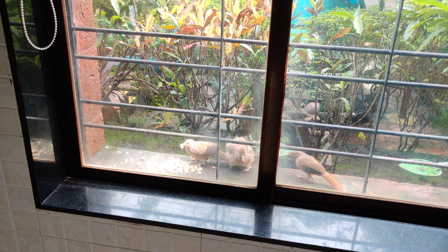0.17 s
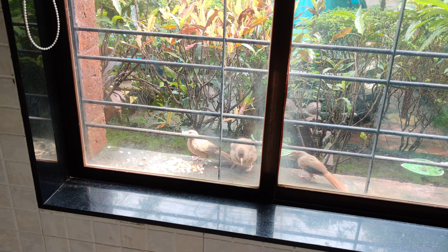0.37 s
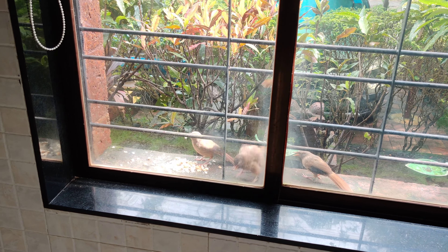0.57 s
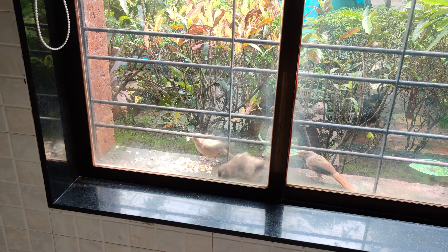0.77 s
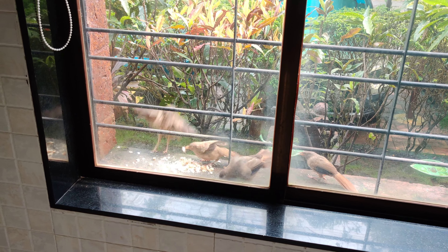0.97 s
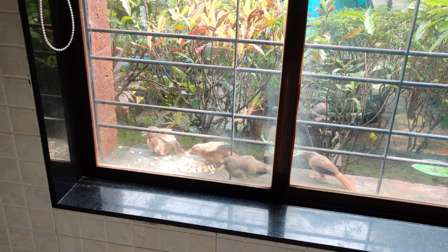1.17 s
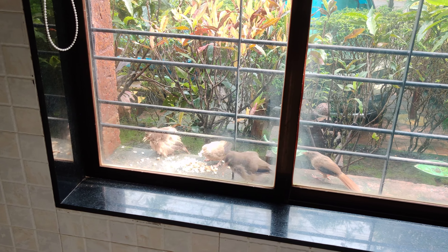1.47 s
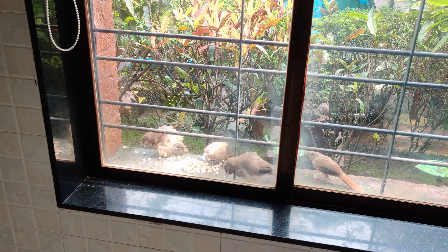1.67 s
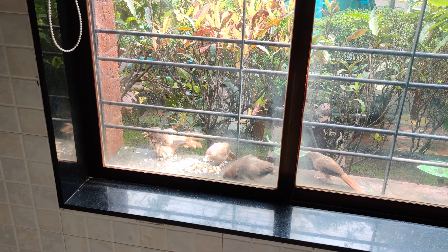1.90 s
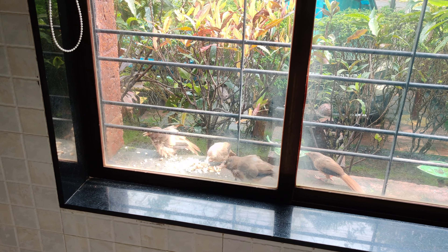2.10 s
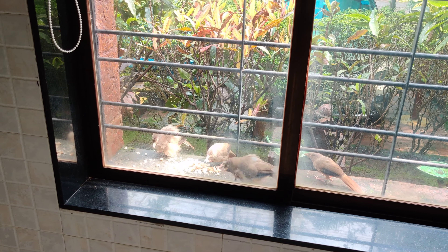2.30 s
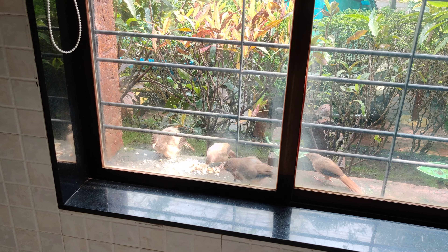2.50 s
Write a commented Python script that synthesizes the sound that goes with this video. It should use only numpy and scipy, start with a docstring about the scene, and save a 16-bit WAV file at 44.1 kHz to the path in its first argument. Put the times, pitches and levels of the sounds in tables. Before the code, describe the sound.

Harsh bird chatter begins with a few sharp dropping chirps, swells into rapid overlapping buzzy rasps, then fades to faint far peeps; picked up indoors with short hard reverberation, soft hum and low rumble.

```python
"""Babblers chatter on a ledge outside a window, heard from a hard tiled room.
From the start, a low hum, rumble and outdoor murmur lie beneath one bird's quick falling chirps, and a faint
low tone soon wavers up. Then the group rasps in overlapping harsh calls; soft peeps of a far bird come last.
Each call is made of uneven pulses and gated noise shaped by throat and beak; the room smears it with echoes
and fading noise tails. Hum, low tone and peeps are sines; murmur and rumble are shaped noise."""
import sys
import numpy as np
from scipy import signal
from scipy.fft import rfft, irfft
from scipy.io import wavfile
from scipy.ndimage import uniform_filter1d

SR = 44100
rng = np.random.default_rng(int(sys.argv[2]) if len(sys.argv) > 2 else 0)


def decibels_to_gain(level_db):
    """Convert a level in decibels to a linear amplitude gain (20 dB per decade)."""
    exponent = np.asarray(level_db, float) / 20
    return 10 ** exponent


def wav_out(sig):
    """Save sig, one row per channel (or a flat mono array), as 16-bit PCM at SR to the path in sys.argv[1]."""
    wavfile.write(sys.argv[1], SR, np.round(np.clip(np.atleast_2d(sig).T, -1, 1) * 32767).astype(np.int16))


N = 116865

# loss of the clear partials from start to end of a call: [chirp/dB, rasp/dB]
CLEAR_FADE_DB = [-26., -6.]


def evened(x):
    """Scales a sound to rms 1."""
    return x / np.sqrt(np.mean(x ** 2) + 1e-20)


def read(points, hz):
    """Reads a curve of (f/Hz, value) points along a logarithmic pitch axis."""
    f, value = np.transpose(points)
    return np.interp(np.log(hz + 1), np.log(f + 1), value)


def add(mix, s, sound):
    """Adds a sound to the mix, starting at s seconds."""
    part = mix[..., max(round(s * SR), 0):][..., :sound.shape[-1]]
    part += sound[..., :part.shape[-1]]


def wander(noise, seconds):
    """Smooths noise into a slower random drift of rms 1."""
    return evened(uniform_filter1d(noise, max(int(seconds * SR), 1)))


def resonate(x, hz, width):
    """A fixed resonance of gain 1, applied twice for steep skirts."""
    b, a = signal.iirpeak(hz, hz / width, SR)
    return signal.lfilter(b, a, signal.lfilter(b, a, x))


def shared_noise(share):
    """Noise for two ears, each also hearing a share of the other's."""
    noise = rng.standard_normal((2, N))
    return noise + share * noise[::-1]


def band(x, hz, width):
    """One resonance of the vocal tract at rms 1, without phase shift so that neighbours add."""
    cut_hz = 469  # a small bird radiates little below this
    f = np.fft.rfftfreq(len(x), 1 / SR)
    peak = 1 / (1 + ((f - hz) / width * 1.3) ** 2) ** 2
    low_cut = 1 / (1 + (cut_hz / (f + 1)) ** 8)
    return evened(irfft(rfft(x) * peak * low_cut, len(x)))


def call(s, db, bend, hz, chest_db, throat, rise, rough, wobble, clear_db, fade_db):
    """Jittered, uneven pulses and cycle-gated noise pass throat and beak; the lowest partials stay clear."""
    # gape of the beaks through the bout: (t/s, top resonance f/Hz, its width/Hz, its level/dB,
    # middle resonance f/Hz, extra hiss/dB)
    gape = [(0, 4600, 700, 0, 2430, 7.5), (.3, 4750, 800, 1.5, 2770, 9.5), (.41, 4590, 700, 8.5, 2600, 8.5),
            (.55, 4580, 930, 4.5, 2700, 7), (.7, 4320, 610, 2.5, 2750, 8), (.9, 4520, 614, -3, 2600, 6.5),
            (1., 4300, 660, 1.5, 2480, 5), (1.15, 4125, 614, -1.5, 2900, 2.5),
            (1.4, 4150, 625, 3, 2760, 5.5), (1.6, 4140, 453, 3.5, 2850, 1.5), (1.8, 4170, 352, 4, 2810, 3),
            (2., 4230, 450, 1, 2760, 4.5), (2.12, 4150, 396, 1.5, 2500, 0), (2.35, 4000, 544, -6, 2870, 8)]
    # hiss in the upper beak resonances: (multiple of the top resonance, width/Hz, level/dB before extra hiss)
    beak_air = [(1.65, 2570, -26), (2.7, 1510, -35.5), (3.2, 1490, -51)]
    rattle_db, rattle_s = 3, 0.0028  # uneven strength of the pulses
    flicker_db, flicker_s = 4, 0.007  # the top resonance flickers within a call
    gape_spread = 0.008  # call-to-call change of the top resonance, as a share
    middle_db, middle_width_hz = -4.5, 600
    chest_hz = 2300  # throat resonances under this follow the chest level

    u = np.linspace(0, 1, len(bend))  # progress through the call
    noise = rng.standard_normal((5, SR // 4))[:, :len(u)]
    times, *columns = np.transpose(gape)
    top_hz, top_width, top_db, middle_hz, hiss_db = (np.interp(s, times, c) for c in columns)
    top_hz *= 1 + gape_spread * noise[0, 0]

    turns = np.cumsum(hz * bend * (1 + wobble * wander(noise[0], 0.0046))) / SR
    folds = sum(np.cos(2 * np.pi * k * turns) for k in range(1, 11))
    puffs = (1.54 + np.exp(-(turns % 1) / 0.12)) * noise[1]  # noise bursts once a cycle
    rattle = decibels_to_gain(rattle_db * np.clip(wander(noise[2], rattle_s), -3, 2))
    rough = np.clip(rough, 0, 1)
    drive = ((1 - rough) * evened(folds) + rough * evened(puffs)) * rattle

    flicker = flicker_db * np.clip(wander(noise[4], flicker_s), -2, 1.5)
    voice = decibels_to_gain(top_db + flicker) * band(drive, top_hz, top_width)
    voice += decibels_to_gain(middle_db) * band(drive, middle_hz, middle_width_hz)
    voice += sum(decibels_to_gain(d + chest_db * (f < chest_hz)) * band(drive, f, w) for f, w, d in throat)

    clear = np.sin(2 * np.pi * turns) + 0.4 * np.sin(4 * np.pi * turns) + 0.3 * np.sin(6 * np.pi * turns)
    clear = decibels_to_gain(clear_db + chest_db + fade_db * u) * clear * rattle ** 0.3
    size = np.sqrt(np.mean((voice + clear) ** 2))
    air = sum(decibels_to_gain(d + hiss_db) * band(noise[3] * rattle, m * top_hz, w) for m, w, d in beak_air)
    shape = np.sin(np.pi / 2 * np.minimum(u / rise, (1 - u) / (1 - rise))) ** 0.6
    return decibels_to_gain(db) * shape * np.array([voice / size + air, clear / size])


def chirps():
    """Quick chirps fall from a sharp start towards their pitch; the clear partials are kept apart."""
    # (start t/s, length/s, level/dB before loudness shape and room, pitch fallen towards f/Hz, chest/dB)
    calls = [(0, 0.012, -38, 931, 2.5), (0.07, 0.08, -40.5, 859, 2.5), (0.142, .04, -43.5, 1136, -9),
             (0.185, 0.084, -37, 868, 0), (0.288, 0.11, -36, 879, -1.5), (0.406, 0.15, -32, 838.5, 0),
             (0.543, 0.095, -29, 758, -3.5), (0.642, 0.072, -31.5, 1124, 1)]
    # throat resonances: (f/Hz, width/Hz, level/dB before the chest level)
    throat = [(960, 1400, -2), (2302, 1100, -0.5), (3570, 1000, 0.5), (5670, 1860, 1)]
    drop, drop_s = 0.45, 0.022  # starts this share too high, falling with this time constant
    out = np.zeros((2, N))
    for s, length, db, hz, chest_db in calls:
        bend = 1 + drop * np.exp(-np.arange(0, length, 1 / SR) / drop_s)
        add(out, s, call(s, db, bend, hz, chest_db, throat, rise=0.09, rough=0.8, wobble=0.012,
                         clear_db=5, fade_db=CLEAR_FADE_DB[0]))
    return out


def response():
    """Direct sound, echoes off sill and tiles, a quick near tail and a long tail dying band by band."""
    # time for the long tail to fall 60 dB: (f/Hz, t60/s)
    fading = [(300, 0.6), (1000, 0.58), (3000, 0.62), (6000, 0.55), (12000, 0.5)]
    # (longest delay t/s, left level/dB, right level/dB), levels against the direct sound
    echoes = [(.0023, -25, -7.5), (.0041, -13, 7), (.0072, -38, 1.5), (.011, -25.5, -37.5),
              (.016, -17.5, -13)]
    # likeness of the two tails: (f/Hz, likeness 0 to 1)
    ports = [(300, 0.59), (700, 0.61), (1300, 0), (3000, 0.)]
    direct_db, long_db, near_db, near_t60 = -7, 1, -1, 0.16  # last one in seconds

    # scattered clicks, one at a random place in every 20 samples
    taps = np.zeros((2, SR))
    at = np.arange(100, SR - 20, 20) + rng.integers(0, 20, (2, (SR - 101) // 20))
    np.put_along_axis(taps, at, rng.choice([-1., 1.], at.shape), 1)
    hz, t, z = signal.stft(taps, SR, nperseg=256)
    same = np.clip(read(ports, hz), 0, 1)[:, None]
    z = np.array([z[0], same * z[0] + np.sqrt(1 - same ** 2) * z[1]])

    out = 0
    for db, t60 in ((long_db, read(fading, hz)[:, None]), (near_db, near_t60)):
        tail = signal.istft(z * decibels_to_gain(-60 * t / t60), SR, nperseg=256)[1]
        out = out + decibels_to_gain(db) * tail / np.linalg.norm(tail[0])
    out[:, 0] += decibels_to_gain(direct_db)
    for k, (s, left_db, right_db) in enumerate(echoes):
        at = round(s * SR * rng.uniform(0.8, 1.0))
        signs = [1, (-1) ** (k + 1)]  # the right side flips at every other echo
        out[:, at] += decibels_to_gain(direct_db + np.array([left_db, right_db])) * signs
    return out


def room(x):
    """Three random room responses take turns, so no fixed ringing lines build up in the echo."""
    turn_s = 0.3423  # time from one response's peak to the next
    turn = np.pi * np.arange(N) / SR / turn_s / 3
    out = 0
    for k in range(3):
        share = np.sqrt(2 / 3) * np.cos(turn + k * np.pi / 3)
        out = out + signal.fftconvolve(x[None] * share, response(), axes=1)[:, :N]
    return out


def murmur():
    """Steady outdoor and room noise with drifting patches, made in short overlapping spectra."""
    # colour of the noise: (f/Hz, relative level/dB)
    colour = [(24, -31), (40, -3.5), (158, -3), (398, 2.5), (707, 1.5), (1170, -10.5), (1700, -12.5),
              (2180, 3.5), (4270, -35), (5090, -34), (15700, -17.5)]
    # left-right likeness: (f/Hz, likeness 0 to 1)
    likeness = [(60, 0.55), (240, 0.8), (950, 0.41), (3770, 0.14), (15000, 0.14)]
    level_db, patch_db = -53, 3.3
    frames, hz = N // 512 + 5, np.fft.rfftfreq(2048, 1 / SR)
    a, b, c, d, patches = rng.standard_normal((frames, 1025, 5)).T
    patches = evened(uniform_filter1d(uniform_filter1d(patches, 8, 0), 8, 1))
    same = np.clip(read(likeness, hz), -1, 1)[:, None]
    left, other = a + 1j * b, c + 1j * d
    z = np.array([left, same * left + np.sqrt(1 - same ** 2) * other])
    z *= decibels_to_gain(read(colour, hz)[:, None] + patch_db * patches)
    return decibels_to_gain(level_db) * evened(signal.istft(z, nperseg=2048, noverlap=1536)[1][:, :N])


def hum():
    """Machine hum: one steady sine whose strength swells and wavers."""
    # (t/s, rms level/dB before the waver)
    swell = [(0.0, -76), (0.4, -68), (0.54, -77), (0.59, -69), (1.06, -72), (1.34, -59.5), (1.39, -64.5),
             (1.84, -68.5), (1.94, -59.5), (2.24, -65.5), (2.47, -59.5), (2.65, -77)]
    hum_hz, depth = 92.5, 0.15
    t = np.arange(N) / SR
    waver = evened(resonate(shared_noise(1.2), 8, 8))
    tone = decibels_to_gain(np.interp(t, *np.transpose(swell))) * np.sqrt(2) * np.sin(2 * np.pi * hum_hz * t)
    return tone * (1 + depth * waver)


def rumble():
    """Hand and air at the microphone: noise through two very low resonances."""
    # (t/s, level/dB)
    swell = [(0.0, -59), (0.3, -57), (0.8, -58), (1.0, -58), (1.09, -53), (1.2, -60), (1.6, -59),
             (1.9, -55), (2.28, -55), (2.5, -57), (2.65, -61)]
    noise = resonate(resonate(shared_noise(0.45), 15.3, 29), 20, 40)
    return evened(noise) * decibels_to_gain(np.interp(np.arange(N) / SR, *np.transpose(swell)))


def moan():
    """A faint low tone wavers in pitch and level; slow noise on its sine and cosine makes it fuzzy."""
    # (t/s, f/Hz, peak level/dB before the fuzz)
    path = [(0.08, 142, -86), (0.114, 138.7, -77), (0.241, 189.7, -57.5), (0.384, 177.5, -53),
            (0.43, 198.6, -60), (0.608, 195.2, -71.5), (0.736, 162.5, -62), (0.818, 189, -56),
            (0.9, 166.5, -68), (0.952, 187, -70), (1.13, 151.5, -75), (1.175, 160.7, -58),
            (1.274, 159, -70), (1.35, 199, -64)]
    fuzz_hz = 27
    t = np.arange(N) / SR
    s, hz, db = np.transpose(path)
    turn = 2 * np.pi * np.cumsum(np.interp(t, s, hz)) / SR
    fuzz_in, fuzz_across = (evened(resonate(shared_noise(1.2), fuzz_hz, fuzz_hz)) for _ in range(2))
    tone = (1 + 0.15 * fuzz_in) * np.sin(turn) + 0.25 * fuzz_across * np.cos(turn)
    return decibels_to_gain(np.interp(t, s, db, -120, -120)) * tone


def rasps():
    """Harsh calls whose pitch arches slightly, highest midway; the clear partials are kept apart."""
    # (start t/s, length/s, level/dB before loudness shape and room, highest pitch f/Hz, chest/dB)
    calls = [(0.667, 0.084, -29.5, 665.4, -3.5), (0.73, 0.1, -26, 784, 0), (0.818, 0.048, -32, 720, -12),
             (0.884, 0.091, -28, 647.6, 3.5), (0.959, 0.064, -26.5, 675, 3.5),
             (0.995, 0.097, -30, 665.6, 1), (1.1, 0.11, -27.5, 659.6, -1), (1.156, 0.13, -27, 630, -2),
             (1.271, 0.059, -33, 637, -7), (1.349, 0.067, -30.5, 644, 1.5), (1.39, 0.077, -27, 649, -2),
             (1.451, 0.075, -26, 667.7, -4.5), (1.519, 0.0556, -31.5, 642, -10),
             (1.581, 0.099, -28.5, 612.2, -2), (1.656, 0.11, -26.5, 681, -3),
             (1.758, 0.055, -30.5, 628, -1), (1.804, 0.079, -26.5, 646.4, -1.5),
             (1.868, 0.085, -26, 668, -2), (1.954, 0.086, -28.5, 705.4, -4), (2.033, 0.099, -28, 653, 0.5),
             (2.117, 0.061, -29, 654.5, -2.5), (2.174, 0.046, -35.5, 619, -5), (2.231, 0.052, -33, 644, -3),
             (2.288, 0.052, -35.5, 546.4, -3), (2.343, 0.044, -39.5, 518, -3.5),
             (2.399, 0.032, -45.5, 524, -12)]
    # throat resonances: (f/Hz, width/Hz, level/dB before the chest level)
    throat = [(700, 260, -13), (1345, 750, -4.5), (2214, 970, -5), (3590, 1200, -1), (5050, 3800, -3.5)]
    arch = 0.07  # share by which the pitch is lower at both ends
    out = np.zeros((2, N))
    for s, length, db, hz, chest_db in calls:
        bend = 1 - arch * np.linspace(-1, 1, round(length * SR)) ** 2
        add(out, s, call(s, db, bend, hz, chest_db, throat, rise=0.3, rough=0.8, wobble=0.035,
                         clear_db=-7.5, fade_db=CLEAR_FADE_DB[1]))
    return out


def peeps():
    """A far bird's short pure sine notes, which arrive without added echo."""
    # (start t/s, f/Hz, peak level/dB, length/s)
    notes = [(2.55, 1720, -50, .028), (2.63, 1970, -50, .035)]
    out = np.zeros(N)
    for s, hz, db, length in notes:
        t = np.arange(0, length, 1 / SR)
        add(out, s, decibels_to_gain(db) * np.sin(np.pi * t / length) * np.sin(2 * np.pi * hz * t))
    return out


def scene():
    """Birds through the room, over the murmur and the low sounds."""
    clear_direct_db = -2  # low clear partials come through the window opening with less echo
    voices, clear = chirps() + rasps()
    birds = room(voices + clear) + decibels_to_gain(clear_direct_db) * clear
    return birds + murmur() + hum() + rumble() + moan() + peeps()


def top_cut(x):
    """Nothing passes above the cut-off."""
    return signal.sosfilt(signal.butter(12, 15810, fs=SR, output="sos"), x)


def record(dry):
    """The two microphone ports differ in colour, so left and right are tilted opposite ways."""
    # (f/Hz, left over right level/dB)
    left_over_right = [(30, 4), (200, 3), (1000, 3.5), (4000, 5), (7000, -5), (9000, 1), (14000, -1.5)]
    lean = read(left_over_right, np.fft.rfftfreq(N, 1 / SR)) / 2
    mix = irfft(rfft(dry) * decibels_to_gain([lean, -lean]), N)
    return top_cut(mix)


dry = scene()
out = record(dry)
wav_out(out)
```